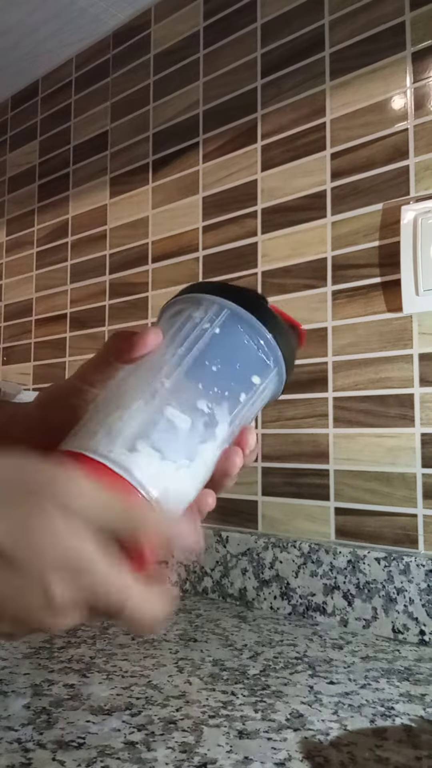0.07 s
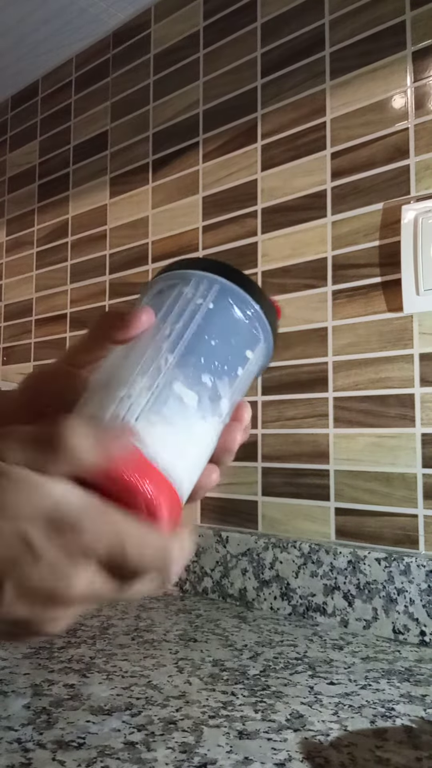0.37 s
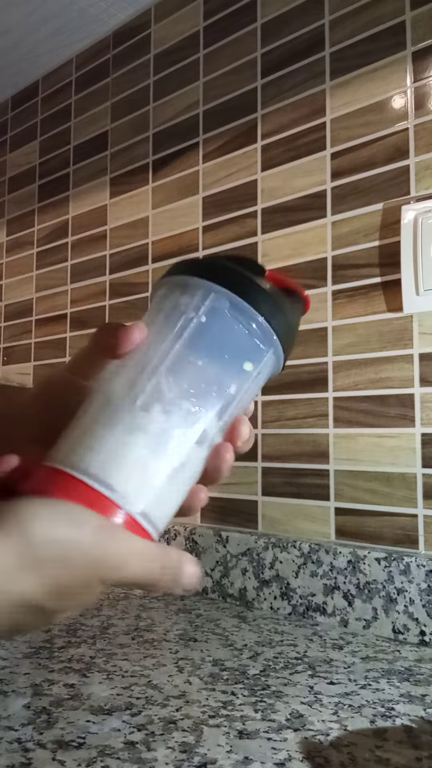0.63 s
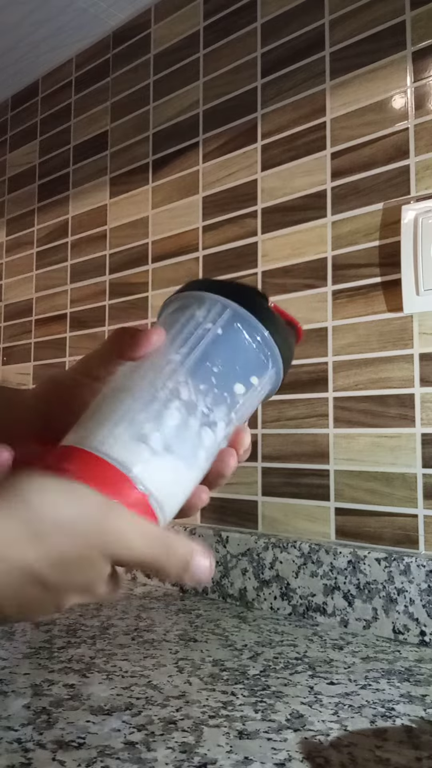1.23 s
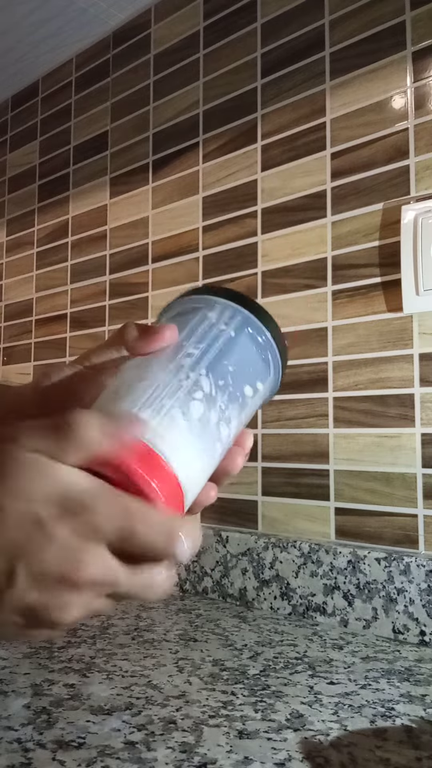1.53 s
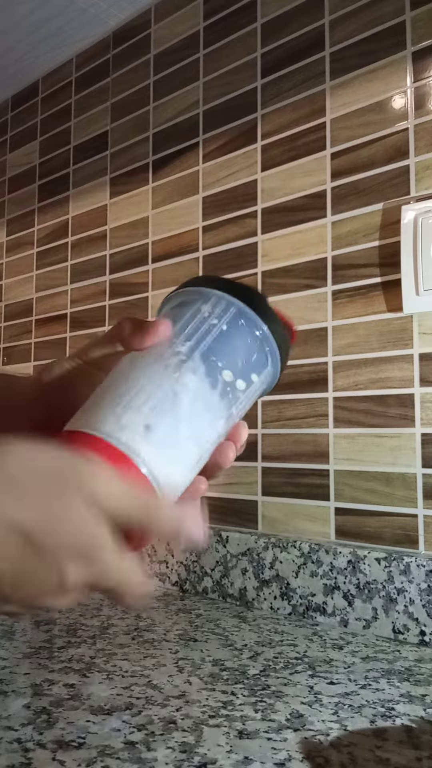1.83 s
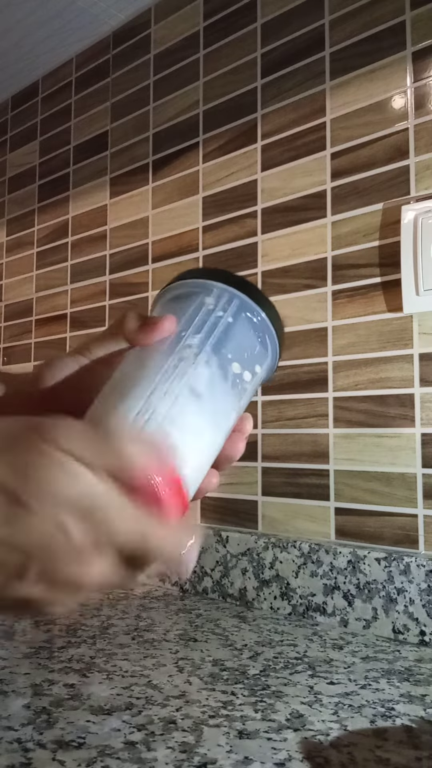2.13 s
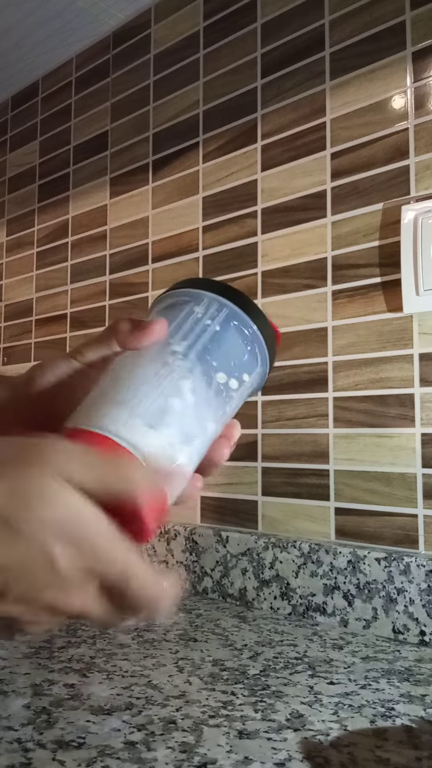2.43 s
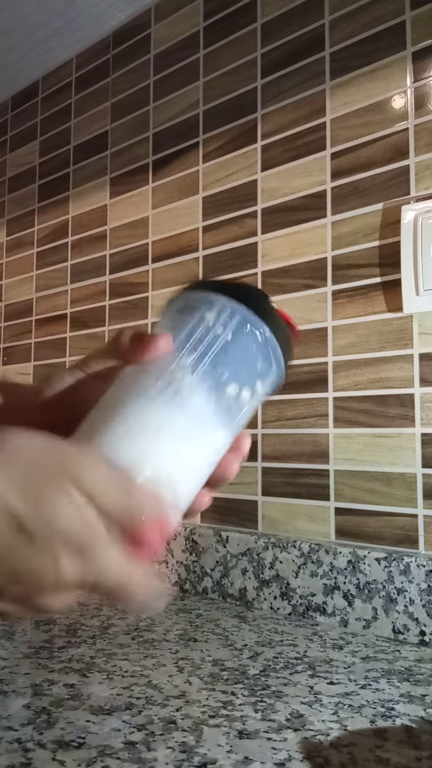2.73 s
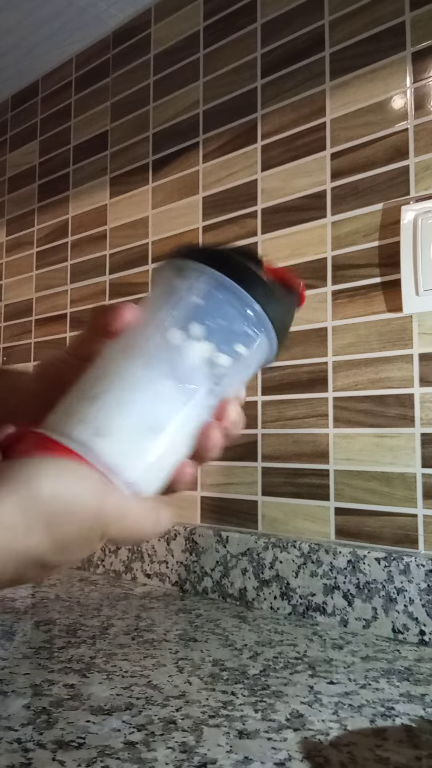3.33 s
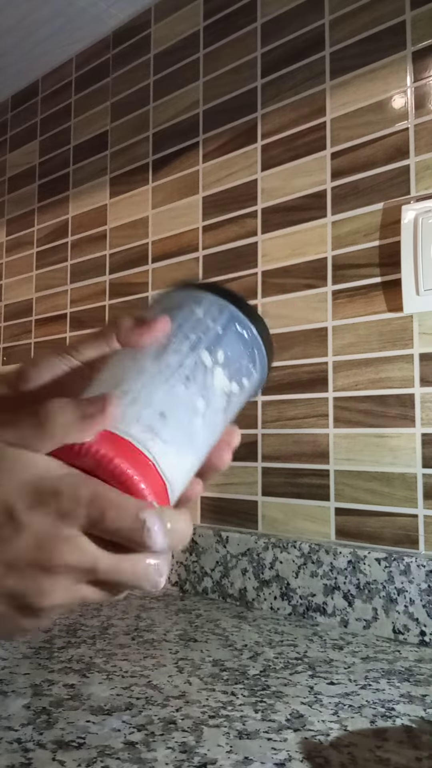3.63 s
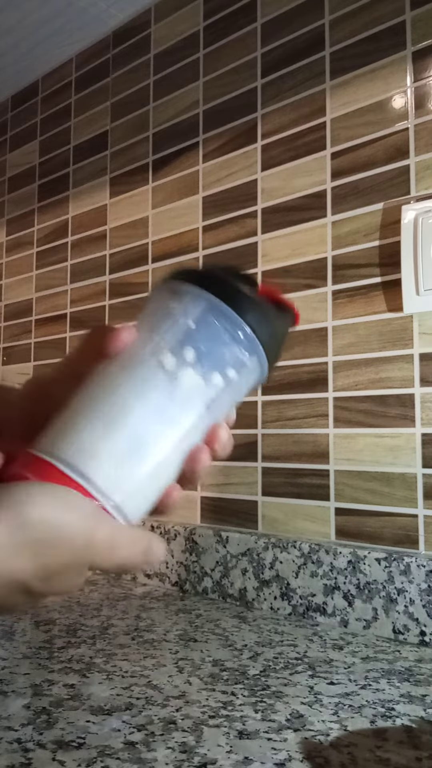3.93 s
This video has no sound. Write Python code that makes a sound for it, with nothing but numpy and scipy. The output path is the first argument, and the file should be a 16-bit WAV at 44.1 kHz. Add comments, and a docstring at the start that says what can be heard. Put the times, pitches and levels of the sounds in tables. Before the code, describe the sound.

A hand blender cup crushes ice in milk, with repeated plastic clatter and swishing.

```python
"""A hand-twisted blender cup crushes ice in milk over a stone counter, in a small tiled kitchen.
It opens on a few knocks as a twist runs down. Seven more twists follow, a little over half a second apart.
Each starts with a low slosh, then the blades sweep through the ice: hard knocks on the plastic wall,
a spray of small chips, a frothy swish of slush. Between twists the pieces tumble and settle and the milk
gulps air, while the cup and the room ring. It ends as the last twist runs down."""
import sys
import numpy as np
from scipy import signal
from scipy.fft import rfft, irfft
from scipy.io import wavfile

SR = 44100
rng = np.random.default_rng(int(sys.argv[2]) if len(sys.argv) > 2 else 0)


def generate_wav(signal):
    """Clip the signal to [-1, 1] and save it as 16-bit WAV at the path in sys.argv[1]."""
    frames = np.transpose(np.atleast_2d(signal))
    scaled = np.clip(frames, -1, 1) * 32767
    pcm = np.round(scaled).astype(np.int16)
    wavfile.write(sys.argv[1], SR, pcm)


N = 4 * SR


def amp(db):
    """Decibels to gain."""
    return 10 ** (np.asarray(db) / 20)


def unit(x):
    """Scales to rms 1."""
    return x / np.sqrt(np.mean(x ** 2) + 1e-20)


def curve_at(points, hz):
    """Reads a curve on a log-frequency axis."""
    freqs, values = np.transpose(points)
    return np.interp(np.log(hz + 1), np.log(freqs + 1), values)


def add(mix, start_s, sound):
    """Drops a sound into the mix at its start time."""
    part = mix[max(round(start_s * SR), 0):][:len(sound)]
    part += sound[:len(part)]


def coloured(x, eq):
    """Shapes a full-length layer with an EQ curve, at rms 1."""
    return unit(irfft(rfft(x) * amp(curve_at(eq, np.fft.rfftfreq(N, 1 / SR))), N))


def lowpass(x, hz):
    """Rolls off a full-length layer above a corner frequency."""
    return irfft(rfft(x) / (1 + (np.fft.rfftfreq(N, 1 / SR) / hz) ** 4), N)


def wobble(hz):
    """Random drift up to a rate, at rms 1."""
    return unit(lowpass(rng.standard_normal(N), hz))


def room_tone(level_db=-78):
    """Still air: a faint, low bed of noise."""
    # colour of the air: freq_hz, gain_db
    air_eq = [(25, -21), (60, -18), (100, 11), (135, -4), (400, -9.5), (3000, -26), (16000, -44)]
    return amp(level_db) * coloured(rng.standard_normal(N), air_eq)


def kitchen(x, wet_db=-14, echoes_per_s=4000, predelay_s=0.004):
    """Tiles and stone add a short tail of dense reflections."""
    # decay of the room: freq_hz, t60_s
    decay_times = [(150, 0.81), (600, 0.7), (2200, 0.34), (6000, 0.34), (14000, 0.15)]
    t = np.arange(SR // 2) / SR
    echoes = rng.standard_normal(len(t)) * (rng.random(len(t)) < echoes_per_s / SR) * (t > predelay_s)
    hz, times, bands = signal.stft(echoes, SR, nperseg=256)
    fade = amp(-60 * times / curve_at(decay_times, hz)[:, None])
    tail = signal.istft(bands * fade, SR, nperseg=256)[1]
    return x + amp(wet_db) * signal.fftconvolve(x, tail / np.linalg.norm(tail))[:N]


def cup_ring(x, sway_depth=0.018, sway_hz=6.7):
    """The cup's modes ring on after every hit, their pitch swaying as the milk moves."""
    # modes of the cup and its air: pitch_hz, gain_db, t60_s
    modes = [(345, 0, 0.056), (521, 3, 0.11), (771.5, -3.5, 0.071), (1163, -1, 0.046), (1572, 1, 0.041),
             (1980, -6.5, 0.06), (2153, -5, 0.11), (2634, -3, 0.11), (3474, -1.5, 0.024)]
    swayed_time = np.cumsum(1 + sway_depth * wobble(sway_hz)) / SR
    out = x
    for hz, db, t60 in modes:
        carrier = np.exp(2j * np.pi * hz * swayed_time)
        pole = np.exp(-np.log(1000) / (t60 * SR))
        envelope = signal.lfilter([1 - pole], [1, -pole], x * np.conj(carrier))
        out = out + 2 * amp(db) * (carrier * envelope).real
    return out


def motion_db(t, tumble_rise_db_per_s=2463, tumble_fall_db_per_s=700):
    """How hard the contents move: each twist spins up, holds and runs down; tumbles fill the pauses."""
    # twists of the base: full_speed_s, rise_db_per_s, hold_s, level_db, fall_db_per_s
    twists = [(-.16, 300, 0.054, -1.5, 120), (0.438, 254, 0.042, 1, 86.5), (1.003, 343, 0.093, -1, 107.5),
              (1.563, 900, 0.1, -1, 111), (2.149, 341, 0.081, -0.5, 95), (2.707, 421.5, 0.074, 1, 93),
              (3.261, 343, 0.014, 0, 71.5), (3.794, 405, 0.072, 1.5, 88)]
    # loose ice tumbling: peak_s, hold_s, level_db
    tumbles = [(0.347, 0.018, -8.5), (0.802, 0.11, -22), (1.397, 0.032, -20.5), (1.855, 0.1, -21.5),
               (2.98, 0.072, -13.5), (3.384, 0.056, -4.5)]
    moves = list(twists)
    moves += [(s, tumble_rise_db_per_s, hold, db, tumble_fall_db_per_s) for s, hold, db in tumbles]
    envelopes = []
    for peak_s, rise, hold_s, db, fall in moves:
        attack = np.minimum(rise * (t - peak_s), 0)
        release = -fall * (t - peak_s - hold_s)
        envelopes.append(db + np.minimum(attack, release))
    return np.max(envelopes, axis=0)


def slosh(t, level_db=-55, follow=0.53, lead_s=0.0073, lump_db=2.5):
    """Milk churns, low and lumpy, just before the blades bite."""
    # colour of the milk and of the hand on the base: freq_hz, gain_db
    slosh_eq = [(25, -6), (55, -13), (100, -14.5), (170, 3), (330, 11), (550, 15), (900, 2), (2000, -34)]
    lumps = rng.standard_normal(N) * amp(lump_db * wobble(hz=35.3))
    return amp(level_db + follow * motion_db(t + lead_s)) * coloured(lumps, slosh_eq)


def glugs(attack_s=0.0031, t60_s=0.051, rise_per_s=4.3):
    """Each trapped bubble rings briefly and rises in pitch."""
    # air pockets gulped by the milk: start_s, pitch_hz, level_db
    pockets = [(0.807, 362, -46.5), (1.496, 650, -38.5), (1.548, 183, -42.5), (2.127, 182, -47),
               (2.654, 676, -36.5), (2.672, 292, -44.5), (3.706, 500, -42.5), (3.79, 157, -47)]
    out, t = np.zeros(N), np.arange(SR // 10) / SR
    for start_s, hz, db in pockets:
        cycles = hz * (t + rise_per_s * t ** 2 / 2)
        envelope = amp(db - 60 * t / t60_s) * np.minimum(t / attack_s, 1)
        add(out, start_s, envelope * np.sin(2 * np.pi * cycles))
    return out


def froth(motion, level_db=-31, spread_db=6.5, pops_per_s=900, pitches=30):
    """Tiny bubbles burst in clumps while the blades whip the milk, and stop soon after."""
    low_hz, high_hz, tilt_db_per_octave, swell_cycles = 2380, 9600, -9.5, 2.17
    out, t = np.zeros(N), np.arange(SR // 100) / SR
    rate = pops_per_s * amp(motion) * wobble(hz=62) ** 2
    gains = amp(level_db + motion / 2 + spread_db * np.minimum(rng.exponential(1, N), 2))
    bursts = gains * rng.choice([-1, 1], N) * (rng.random(N) < rate / SR)
    pitch_index = rng.integers(0, pitches, N)
    for k, hz in enumerate(np.geomspace(low_hz, high_hz, pitches)):
        age = hz * t / swell_cycles
        pop = np.sin(2 * np.pi * hz * t) * age * np.exp(-age)
        tilt = amp(tilt_db_per_octave * np.log2(hz / low_hz))
        out += tilt * signal.oaconvolve(bursts * (pitch_index == k), pop)[:N]
    return out


def swish(motion, level_db=-39, follow=0.85, grain_db=3.5):
    """Slush scrapes round the wall with a grainy hiss."""
    # colour of the slush, plus a faint microphone resonance near 15 kHz: freq_hz, gain_db
    swish_eq = [(100, -52), (330, -13), (600, -5), (1150, 6), (2100, 6.5), (3400, -5.5), (4600, -3),
                (6400, -4), (8500, -12), (13500, -26), (14900, -15)]
    grains = rng.standard_normal(N) * amp(grain_db * wobble(hz=258))
    return amp(level_db + follow * motion) * coloured(grains, swish_eq)


def muffled(spray, motion, corner_hz=6040, follow=0.6):
    """Spray loses its top end as it slows down."""
    body = lowpass(spray, corner_hz)
    return body + (spray - body) * amp(follow * motion)


def ice_hit(treble_db, bass_db, cushion=0, size=1024):
    """One piece of ice on plastic: a click and its reflections in the cup, levelled on the midrange."""
    # colour of ice striking the wall, plus a faint microphone resonance near 15 kHz: freq_hz, gain_db
    hit_eq = [(40, -37), (120, -49.5), (330, -20.5), (700, -9.5), (1150, -4.5), (1380, -4), (1600, 1),
              (2080, 5.5), (2900, 2.5), (4300, 1), (6400, 0), (8200, -11.5), (13500, -29.5), (14900, -17.5)]
    bass_trim_db, treble_trim_db = 10, -2
    ping_db, ping_width = 4.5, 0.09
    scatter_gain, scatter_s, cushion_s = 1.45, 0.0042, 0.0015
    hz, t = abs(np.fft.fftfreq(size, 1 / SR)), np.arange(size) / SR
    db = curve_at(hit_eq, hz * np.exp(0.031 * rng.standard_normal()))  # pieces differ in size
    db += (bass_db + bass_trim_db) * np.interp(hz, (720, 1900), [1, 0])
    db += (treble_db + treble_trim_db) * np.interp(hz, (2040, 4690, 10200), [0, 1, 1.35])
    ping_hz = 2120 * np.exp(0.16 * rng.standard_normal())  # each piece has a short note of its own
    db += ping_db / (1 + ((hz / ping_hz - 1) / ping_width) ** 2)
    colour = np.exp(np.conj(signal.hilbert(np.log(amp(db)))))  # minimum phase keeps the attack tight
    soft_onset = 1 - cushion * np.exp(-(t / cushion_s) ** 2)
    scatter = rng.standard_normal(size) * np.exp(-t / scatter_s) * soft_onset
    click = (1 - cushion) * (t == 0)
    spectrum = colour * np.fft.fft(click + scatter_gain * scatter / np.linalg.norm(scatter))
    mid_energy = np.sum(abs(spectrum[(hz > 1400) & (hz < 3200)]) ** 2) / size
    mid_rms = np.sqrt(mid_energy / (0.006 * SR))  # as if spread over 6 ms
    return np.fft.ifft(spectrum).real / mid_rms


def chips(motion, level_db=-39.5, follow=0.79, spread_db=3.5, chips_per_s=330, variants=24):
    """Small chips patter at random, thicker and harder while the blades spin."""
    rate = chips_per_s * amp(motion / 2)
    gains = amp(level_db + follow * motion + spread_db * np.minimum(rng.exponential(1, N), 2.6))
    hits = gains * (rng.random(N) < rate / SR)
    variant = rng.integers(0, variants, N)
    out = np.zeros(N)
    for k, (brightness, weight) in enumerate(rng.standard_normal((variants, 2))):
        chip = ice_hit(treble_db=-12 + 7 * brightness, bass_db=-12.5 + 3 * weight)
        out += signal.oaconvolve(hits * (variant == k), chip)[:N]
    return out


def knocks(trim_db=-4.5, cushion_below_db=-30.5, cushion_per_db=0.7):
    """Large pieces strike one by one; slush cushions the gentler knocks and blunts their attack."""
    # ice on the cup and blades, before trims, tone relative to the mids:
    # start_s, level_db, treble_db, bass_db
    strikes = [(0.0266, -22.5, -1.5, -6), (0.0584, -27, -11, -11.5), (0.105, -35, -13, -12),
               (0.176, -37.5, -6.5, -10), (0.1973, -34.5, -23, -8), (0.2998, -34, -11, -12),
               (0.353, -22, -6.5, -21), (0.3791, -26, 1.5, -3.5), (0.4298, -20, -7.5, -20),
               (0.442, -17, -34, -33), (0.5016, -18.5, -16.5, -23), (0.5237, -23, -19, -15),
               (0.5411, -16.5, -16.5, -25), (0.5482, -22.5, -4, -10.5), (0.562, -19.5, -37, -51),
               (0.5852, -18, -11.5, -29), (0.6054, -26, -14, -33), (0.7765, -22.5, -17.5, -11),
               (0.801, -39, -12, -4), (0.851, -38.5, -14.5, 1), (0.959, -32, -50, -7),
               (0.9965, -23, -8, -10), (1.0183, -17, -6.5, -15), (1.0651, -19, -11, -25),
               (1.1128, -22.5, -3, -7), (1.1993, -25.5, -7.5, -10), (1.2339, -24.5, -17.5, -9),
               (1.2976, -29.5, -5, -12), (1.326, -60, 21.5, -6), (1.3845, -36.5, -23, -11),
               (1.493, -34, -6, -2), (1.5376, -42, -19, -16), (1.5526, -27.5, -11, -7),
               (1.5707, -27, -3, -13), (1.5911, -22.5, -1, -30), (1.6258, -18.5, -40, -27),
               (1.6921, -18.5, -5, -11), (1.7055, -19, -19, -30), (1.7386, -21, -8, -17),
               (1.7607, -23.5, -11, -26), (1.7934, -31, -9.5, -3.5), (1.8383, -34.5, -3.5, 4),
               (1.8525, -39.5, -5, -12), (1.8755, -21.5, -3.5, -13.5), (1.9417, -36, -6.5, 3),
               (2.0542, -36, -12.5, -5), (2.1023, -31.5, -8, -8.5), (2.1339, -24, -8.5, -2),
               (2.1519, -19, -10, -25), (2.1759, -16.5, -24, -26), (2.203, -15, -27, -46),
               (2.2279, -27.5, 1, -32), (2.2483, -23.5, -10.5, -40), (2.295, -21.5, -10.5, -16),
               (2.342, -26.5, -27, -9.5), (2.4668, -23, -31, -17), (2.4838, -27.5, -32, -27),
               (2.6255, -31, -13.5, -7), (2.6973, -26, -0.5, -29), (2.7113, -17.5, -3, -8),
               (2.728, -21, -11, -38), (2.7423, -15.5, -12, -24), (2.7521, -22, -10, -5.5),
               (2.766, -22, 0.5, -36), (2.7858, -24.5, -19, -27), (2.813, -20, -7.5, -14),
               (2.8361, -24.5, -22, -9.5), (2.8769, -18, -10, -17.5), (2.9299, -24.5, -3.5, -12.5),
               (2.9838, -21, -8, -15), (3.0016, -20, -7.5, -11.5), (3.0268, -22, -20, -12.5),
               (3.1883, -30.5, -16.5, 0.5), (3.2443, -30.5, -33, 4), (3.2597, -20.5, -2, -11),
               (3.2789, -20, -6, -24), (3.2864, -13.5, -13, -19), (3.308, -18.5, -5.5, -26),
               (3.3192, -17.5, -15.5, -21), (3.3406, -22, -34, -39), (3.4359, -22.5, -27, -15.5),
               (3.523, -23, -4, -10.5), (3.5602, -23.5, -5, -10), (3.5951, -34, -35, 2),
               (3.6158, -34.5, -9, -1), (3.6582, -32, -19, -18), (3.707, -31, -19.5, -13),
               (3.7938, -19, -4, -10.5), (3.8134, -17, -10, -32), (3.8204, -15.5, -10.5, -33),
               (3.8314, -18.5, -21, -26), (3.8594, -22, -6, -22), (3.8717, -22, -6, -13),
               (3.8843, -22, -1, -27), (3.9132, -29, -5.5, -14), (3.9352, -19, -15, -15.0),
               (3.962, -24, -20, -11)]
    out = np.zeros(N)
    for start_s, db, treble_db, bass_db in strikes:
        cushion = np.clip(cushion_per_db * (cushion_below_db - db), 0, 1)
        add(out, start_s, amp(db + trim_db) * ice_hit(treble_db, bass_db, cushion))
    return out


def scene():
    """Ice and milk in the cup, the cup in the kitchen, in mono."""
    t = np.arange(N) / SR
    motion = motion_db(t)  # layers ride this envelope; their "follow" is dB per dB of motion
    ice = knocks()
    spray = muffled(chips(motion) + swish(motion), motion)
    contents = ice + spray + froth(motion) + slosh(t) + glugs()
    return (kitchen(cup_ring(contents)) + room_tone())[None]


def record(dry):
    """A steep high cut takes off the very top."""
    high_cut = signal.firwin(511, 16200, window=("kaiser", 9), fs=SR)
    return signal.oaconvolve(dry, high_cut[None], "same")


dry = scene()
out = record(dry)
generate_wav(out)
```